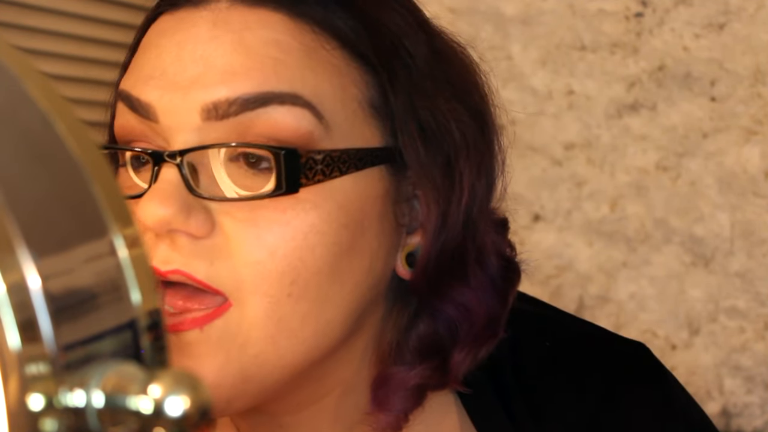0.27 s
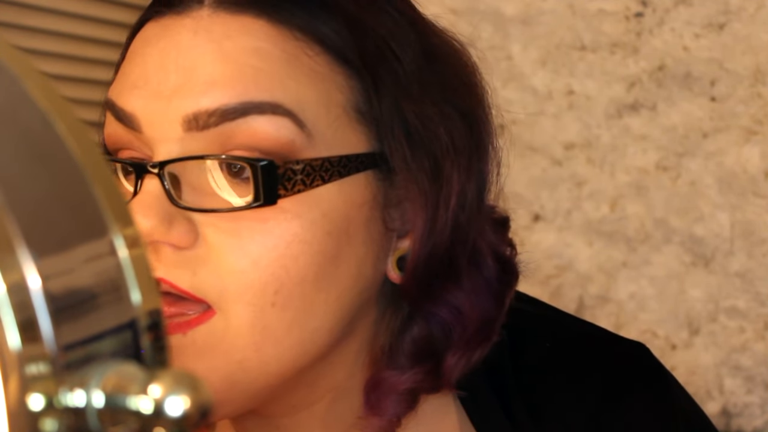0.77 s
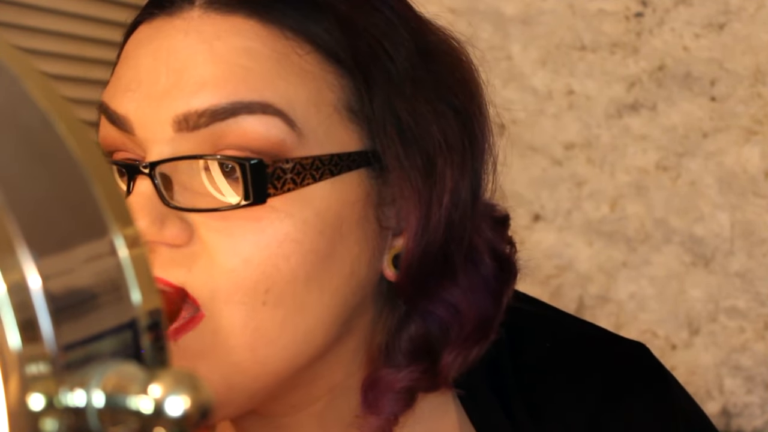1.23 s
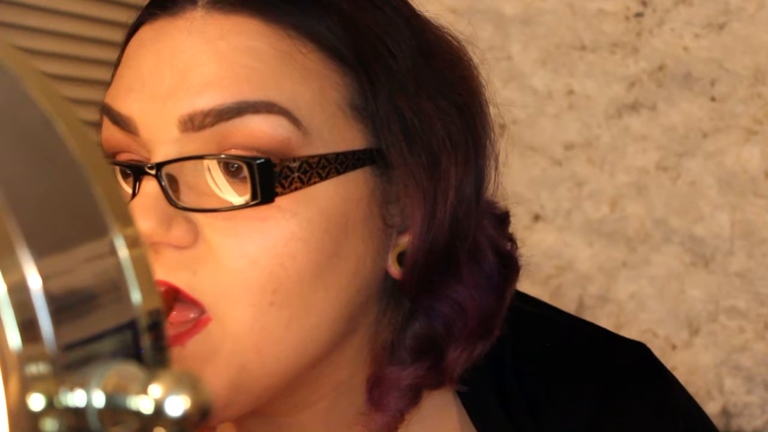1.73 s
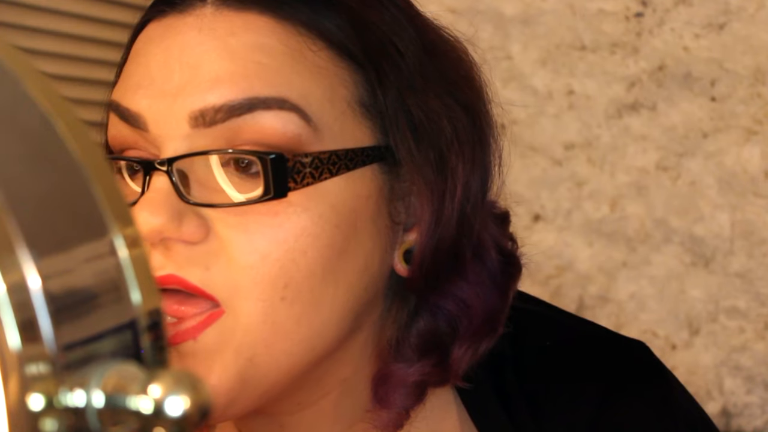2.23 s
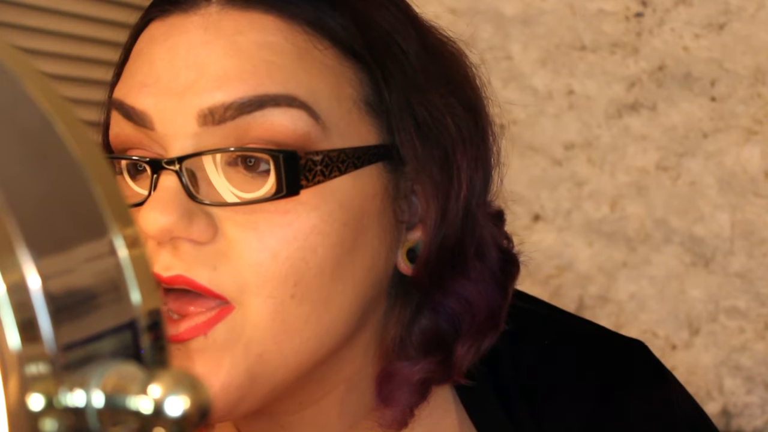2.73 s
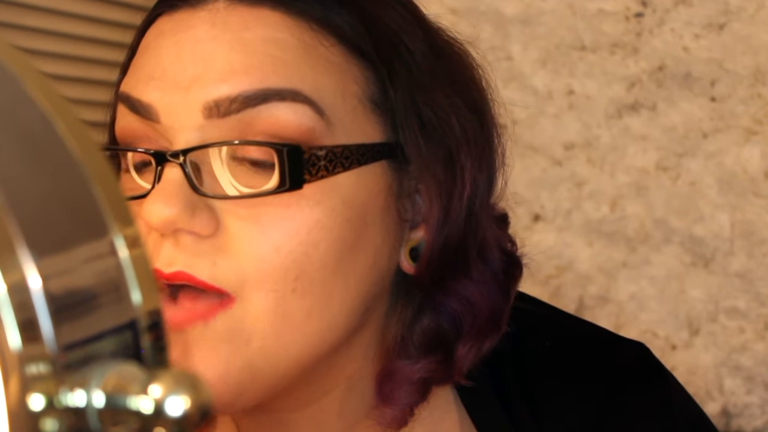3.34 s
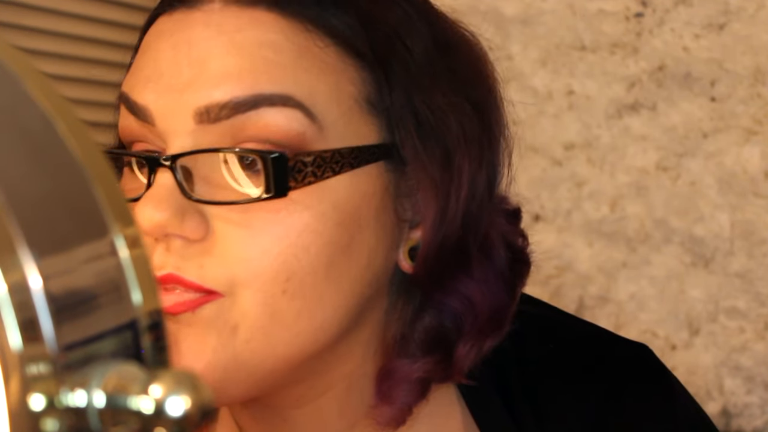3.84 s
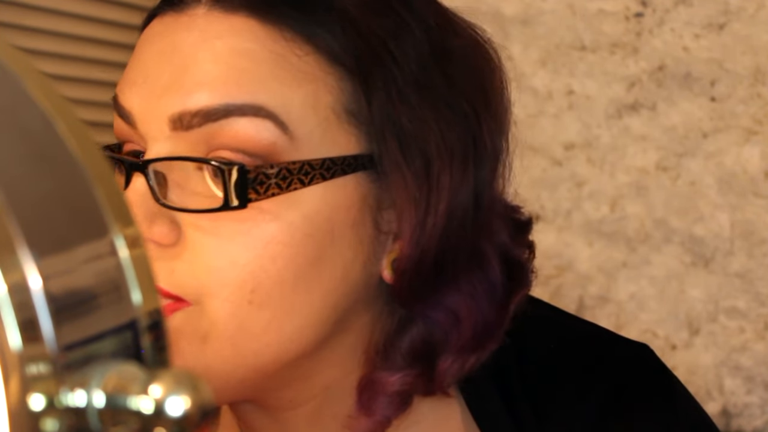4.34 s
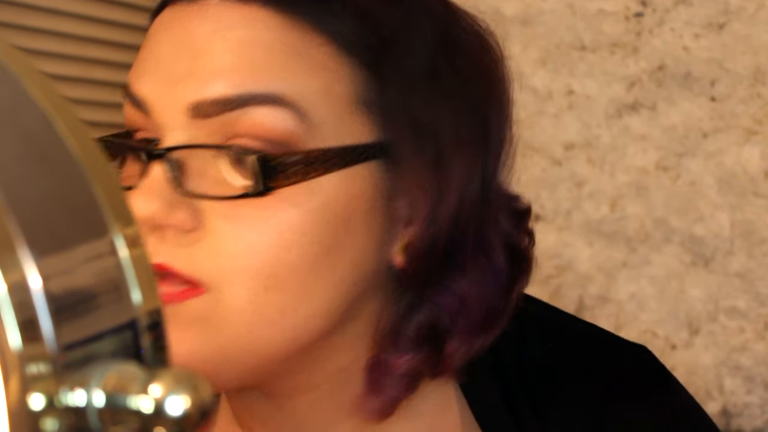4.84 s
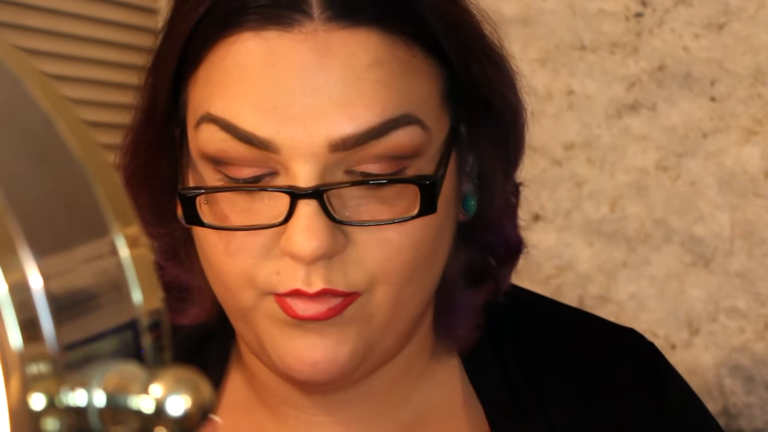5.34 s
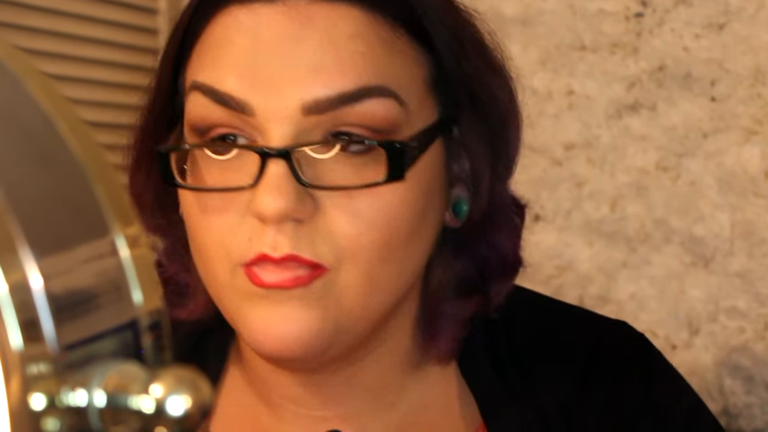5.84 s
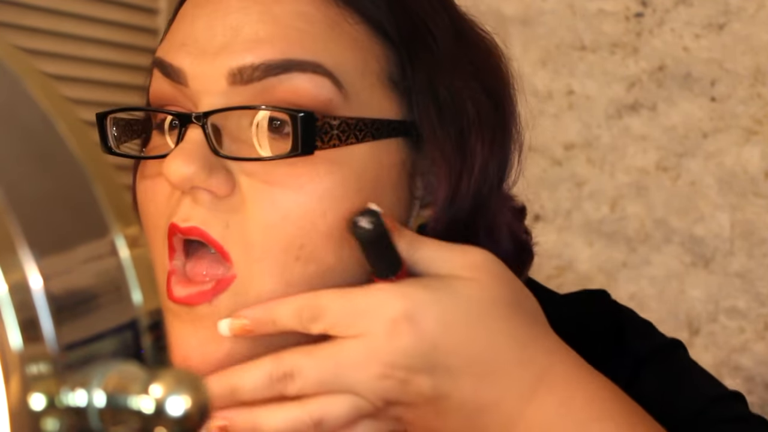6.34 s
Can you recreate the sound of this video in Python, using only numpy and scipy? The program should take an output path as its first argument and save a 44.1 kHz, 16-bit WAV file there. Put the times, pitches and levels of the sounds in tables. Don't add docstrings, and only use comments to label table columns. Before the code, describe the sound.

Small plastic cosmetic tubes click and tap faintly over steady room hiss, then a cap snaps shut sharply, followed by slight handling rustles.

```python
import sys
import numpy as np
from scipy import signal
from scipy.fft import rfft, irfft, next_fast_len
from scipy.io import wavfile
from scipy.ndimage import uniform_filter1d

SR = 44100
rng = np.random.default_rng(int(sys.argv[2]) if len(sys.argv) > 2 else 0)


def master(y):
    cut = np.clip(np.atleast_2d(y).T, -1, 1)
    pcm = np.round(cut * 32767)
    wavfile.write(sys.argv[1], SR, pcm.astype(np.int16))


def amplitude_ratio(level_db):
    exponent = np.asarray(level_db, float) / 20
    return 10 ** exponent


N = 290707

# f/Hz, density/dB [per Hz]
HISS_SPECTRUM = [(15, -56), (25, -31), (40, -17.5), (82, -13.5), (114, -16), (175, -9.5), (363, -6.5),
                 (394, -6.5), (531, -7), (591, -7), (641, -6.5), (1130, -6.5), (7110, -17.5), (13600, -31),
                 (16000, -41)]
# f/Hz, width/Hz, rms/dB
DRONE_BANDS = [(56.9, 1.7, -87), (90.5, 6, -80.5)]
# f/Hz, density/dB [per Hz]
CLOTH_SPECTRUM = [(300, -5), (1000, -2), (2500, -1), (4500, -2), (8000, -13), (12000, -17), (15000, -29)]
# start t/s, hold/s, level/dB
STROKES = [
    (5.09, .06, -62),
    (5.91, .04, -57),
    (6.052, .02, -65),
    (6.124, .12, -55),
    (6.30, .03, -70),
]
# t/s, peak level/dB, t60/s
THUMPS = [
    (3.3710, -37.5, 0.029),
    (4.8510, -39.5, .06),
    (5.7172, -32.5, 0.011),
    (5.7490, -34, 0.02),
    (5.7744, -26.5, 0.013),
    (5.9610, -40.5, 0.066),
]
# t/s, peak level/dB, f/Hz, width/Hz
PRESSES = [(.9343, -39.5, 3820, 1800), (.9350, -41, 2000, 1400), (.9380, -43, 1090, 700),
           (2.5500, -35.5, 4000, 3500), (3.1170, -40, 2300, 3000), (3.3675, -37, 2780, 3500),
           (4.94, -39, 3200, 3000), (5.144, -47.5, 2400, 1500), (5.716, -40, 3420, 2500),
           (4.850, -38, 1500, 2500), (3.649, -45.5, 2200, 3500), (5.6325, -40, 4500, 4000),
           (5.667, -43, 3500, 3500), (5.9570, -37, 2200, 3000)]
# t/s, peak level/dB, f/Hz, t60/s
TAPS = [(1.309, -38, 2800, .02), (1.3154, -37.5, 3200, .025), (2.5485, -40.5, 2000, 0.075),
        (3.3955, -30.5, 4370, .021), (3.395, -41, 2000, .05), (3.6494, -41, 2490, .042),
        (4.8508, -39, 2480, .03), (4.9385, -36.5, 2060, 0.065), (5.6332, -36.5, 1500, .07),
        (5.6692, -25.5, 1490, 0.014), (5.6877, -37, 1430, .032), (5.7180, -36.5, 1600, 0.041),
        (5.9568, -29, 1920, 0.044)]
# t/s, peak level/dB, f/Hz, t60/s
CRACKS = [(.0064, -37.5, 5760, .033), (.9337, -33, 8500, .034), (1.3053, -37, 5000, .02),
          (1.3152, -38, 6000, .015), (2.5485, -33.5, 8500, 0.056), (3.116, -36, 7900, .034),
          (3.3674, -45, 7000, .054), (3.3950, -31, 6500, .015), (4.8155, -50, 8000, .02),
          (4.851, -39.5, 7000, .036), (4.9390, -31.5, 8500, 0.042), (5.633, -34, 9000, .03),
          (5.6685, -31, 8000, .018), (5.689, -38, 8500, 0.038), (5.7150, -33.5, 6500, .028),
          (5.9680, -45, 6500, .03), (5.9935, -39.5, 10000, .03), (6.096, -29.5, 7800, .025),
          (6.1400, -46.5, 9900, .03), (6.1780, -41, 8500, .03), (6.2495, -44, 9500, .02)]
# f/Hz, width/Hz, peak level/dB, t60/s
AFTER_RING = [(410, 340, -34, 0.17), (1010, 410, -32.5, 0.13), (1500, 690, -28, 0.17),
              (2300, 430, -22, 0.12), (2740, 400, -20.5, .15), (3550, 600, -33.5, 0.16),
              (5450, 2100, -29, 0.13), (8500, 4200, -27, 0.11), (12500, 3000, -42, .07)]
# f/Hz, level/dB, t60/s
CAP_MODES = [(366, -15, 0.014), (1300, -11, 0.0092), (1620, -4, 0.012), (2240, 2.5, 0.015),
             (2790, 1, 0.0091), (3490, 1, 0.0059), (4930, -12, 0.0076), (6030, -10.5, 0.0071),
             (7430, -.4, 0.0042), (9000, 0, 0.0052), (10800, -9, 0.0055), (14200, -30, .006)]
# t/s, level/dB
CAP_HITS = [
    (5.7762, -8.5),
    (5.7768, -12),
    (5.7776, -15),
    (5.781, -18),
]

HISS_DB = -56
WHINE_HZ, WHINE_DB, WANDER_HZ = 603.6, -68.5, 1.11
ROOM_DB, ROOM_T60_S, ROOM_GAP_S, WALL_CUT_HZ = -16, 0.25, 0.003, 6000
SWELL_DB_PER_S, FADE_DB_PER_S = 170, 260
CLOTH_DB, CATCH_DB, CATCHES_PER_S = 2.0, -10, 700
TABLE_HZ, TABLE_WIDTH_HZ, THUMP_RISE_PER_T60 = 380, 450, 0.047
PRESS_T60_S, PRESS_RISE_S = 0.05, 0.0032
TAP_WIDTH_PER_HZ, TAP_RISE_S = 0.36, 0.00058
CRACK_WIDTH_HZ, CRACK_RISE_S, CRACK_CONTACT = 4400, 0.00026, 6.0
CONTACT_S = 0.0047
TICK_LEN, AFTER_LEN = 4096, 8192
HIT_DB, HIT_SPREAD_DB, AFTER_RISE_S = -3.0, 2.0, 0.0016
MIC_LOW_HZ, MIC_TOP_HZ = 151, 11100
SIDE_DB, SIDE_HZ = -30, 4500
CUTOFF_HZ = 16600


def rms_one(x):
    return x / np.sqrt(np.mean(x ** 2) + 1e-20)


def peak_one(x):
    return x / np.max(np.abs(x))


def coloured(spectrum):
    size = next_fast_len(N)
    hz, db = np.transpose(spectrum)
    bins_hz = np.maximum(np.arange(size // 2 + 1) * SR / size, 1)
    gain = amplitude_ratio(np.interp(np.log(bins_hz), np.log(hz), db))
    white = rfft(rng.standard_normal(size))
    return rms_one(irfft(white * gain, size)[:N])


def resonance(x, hz, width_hz):
    r = np.exp(-np.pi * width_hz / SR)
    gain = (1 - r * r) / 2
    return signal.lfilter([gain, 0, -gain], [1, -2 * r * np.cos(2 * np.pi * hz / SR), r * r], x)


def steep_resonance(x, hz, width_hz):
    return resonance(resonance(x, hz, width_hz), hz, width_hz)


def ring(clicks, hz, t60_s):
    r, w = amplitude_ratio(-60 / (t60_s * SR)), 2 * np.pi * hz / SR
    return signal.lfilter([0, np.sin(w)], [1, -2 * r * np.cos(w), r * r], clicks + 1e-18)


def burst(noise, hz, width_hz, t60_s, rise_s, contact=0.0):
    t = np.arange(len(noise)) / SR
    decay = amplitude_ratio(-60 * t / max(t60_s, 0.004))
    rise = 1 - np.exp(-t / max(rise_s, 1e-4))
    force = noise * decay * rise
    force[2] += contact
    return peak_one(steep_resonance(force, hz, 1.33 * width_hz))


def background():
    drone = np.zeros(N)
    for hz, width_hz, db in DRONE_BANDS:
        drone += amplitude_ratio(db) * rms_one(steep_resonance(rng.standard_normal(N), hz, width_hz))
    wander = rms_one(uniform_filter1d(rng.standard_normal(N), size=6000))
    phase = 2 * np.pi * np.cumsum(WHINE_HZ + WANDER_HZ * wander) / SR
    whine = amplitude_ratio(WHINE_DB) * np.sqrt(2) * np.sin(phase)
    hiss = amplitude_ratio(HISS_DB) * coloured(HISS_SPECTRUM)
    return hiss + drone + whine


def room(x):
    t = np.arange(SR // 2) / SR
    tail = rng.standard_normal(len(t)) * amplitude_ratio(-60 * t / ROOM_T60_S) * (t > ROOM_GAP_S)
    dull = np.exp(-2 * np.pi * WALL_CUT_HZ / SR)
    tail = signal.lfilter([1 - dull], [1, -dull], tail)
    tail /= np.sqrt(np.sum(tail ** 2))
    return amplitude_ratio(ROOM_DB) * signal.fftconvolve(x, tail)[:N]


def brush():
    t = np.arange(N) / SR
    level = np.zeros(N)
    for start_s, hold_s, db in STROKES:
        swell_db = SWELL_DB_PER_S * np.maximum(start_s - t, 0)
        fade_db = FADE_DB_PER_S * np.maximum(t - start_s - hold_s, 0)
        level += amplitude_ratio(db - swell_db - fade_db)
    sizes = amplitude_ratio(3 * np.minimum(rng.exponential(1, N), 4)) * rng.choice([-1, 1], N)
    caught = rng.random(N) < CATCHES_PER_S / SR
    catches = resonance(sizes * caught, 7300, 5000)
    return level * (amplitude_ratio(CLOTH_DB) * coloured(CLOTH_SPECTRUM) + amplitude_ratio(CATCH_DB) * rms_one(catches))


def ticks():
    knocks = []  # t/s, level/dB, f/Hz, width/Hz, t60/s, rise/s
    for s, db, hz, t60_s in TAPS:
        knocks.append((s, db, hz, TAP_WIDTH_PER_HZ * hz, t60_s, TAP_RISE_S))
    for s, db, hz, width_hz in PRESSES:
        knocks.append((s, db, hz, width_hz, PRESS_T60_S, PRESS_RISE_S))
    for s, db, t60_s in THUMPS:
        knocks.append((s, db, TABLE_HZ, TABLE_WIDTH_HZ, t60_s, THUMP_RISE_PER_T60 * t60_s))

    events = []
    for s, db, hz, t60_s in CRACKS:
        events.append((s, db, hz, CRACK_WIDTH_HZ, t60_s, CRACK_RISE_S, CRACK_CONTACT))
    for knock in knocks:
        rise_s = knock[-1]
        events.append((*knock, CONTACT_S / max(rise_s, 3e-4)))

    out = np.zeros(N + TICK_LEN)
    slip_noise = rng.standard_normal((64, TICK_LEN))
    for (s, db, *colour), slips in zip(events, slip_noise):
        at = round(s * SR)
        out[at:at + TICK_LEN] += amplitude_ratio(db) * burst(slips, *colour)
    return out[:N]


def snap():
    s, db = np.transpose(CAP_HITS)
    at = np.round(s * SR).astype(int)
    facing = rng.choice([-1, 1], len(at))
    out = np.zeros(N)
    for k, (hz, level_db, t60_s) in enumerate(CAP_MODES):
        spread_db = rng.normal(0, HIT_SPREAD_DB, len(at))
        clicks = np.zeros(N)
        clicks[at] = amplitude_ratio(db + HIT_DB + level_db + spread_db) * facing * (-1) ** k
        out += ring(clicks, hz, t60_s)
    for hz, width_hz, level_db, t60_s in AFTER_RING:
        noise = rng.standard_normal(AFTER_LEN)
        out[at[0]:at[0] + AFTER_LEN] += amplitude_ratio(level_db) * burst(noise, hz, width_hz, t60_s, AFTER_RISE_S)
    return out


def microphone(x):
    x = signal.sosfilt(signal.butter(6, MIC_LOW_HZ, "high", fs=SR, output="sos"), x)
    return signal.sosfilt(signal.butter(2, MIC_TOP_HZ, fs=SR, output="sos"), x)


def scene():
    handling, hit = ticks(), snap()
    mono = microphone(handling + room(handling) + hit + brush()) + background()
    high = signal.butter(6, SIDE_HZ, "high", fs=SR, output="sos")
    treble = signal.sosfilt(high, microphone(hit))
    signs = rng.choice([-1, 1], N // 64 + 1).repeat(64)[:N]
    side = amplitude_ratio(SIDE_DB) * treble * signs
    return mono + side * [[1], [-1]]


def roll_off(x):
    return signal.sosfilt(signal.butter(12, 16430, fs=SR, output="sos"), x)


def record(dry):
    low = signal.cheby2(12, 60, CUTOFF_HZ, fs=SR, output="sos")
    mix = signal.sosfilt(low, dry)
    return roll_off(mix)


dry = scene()
out = record(dry)
master(out)
```